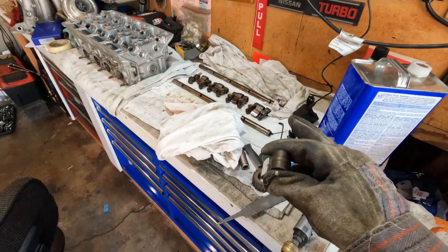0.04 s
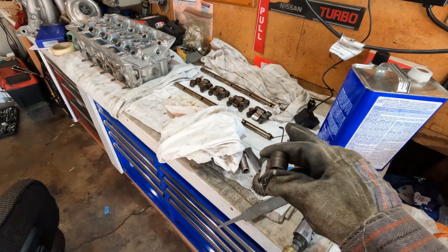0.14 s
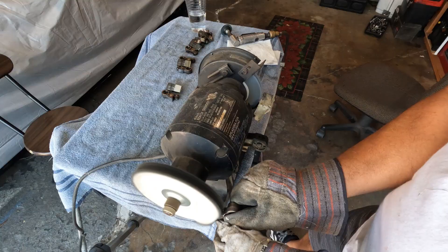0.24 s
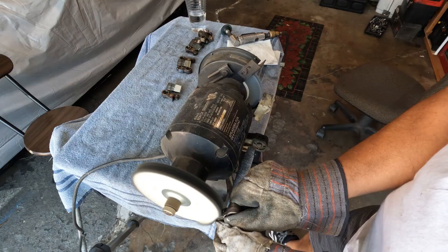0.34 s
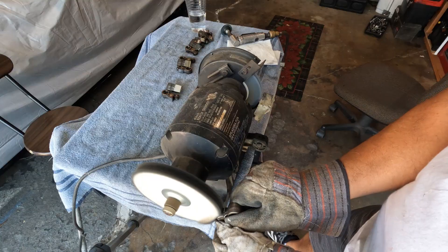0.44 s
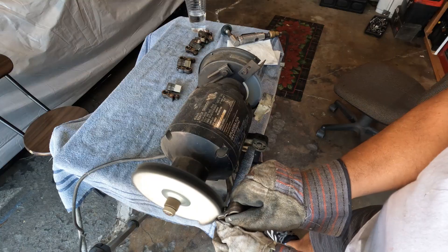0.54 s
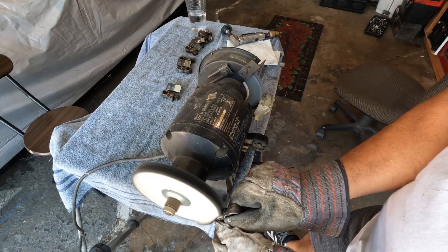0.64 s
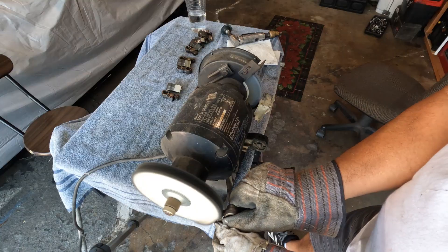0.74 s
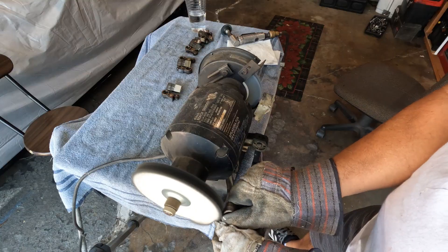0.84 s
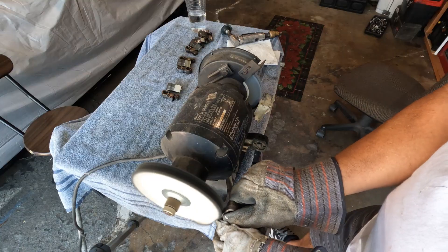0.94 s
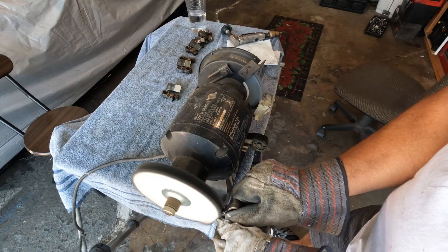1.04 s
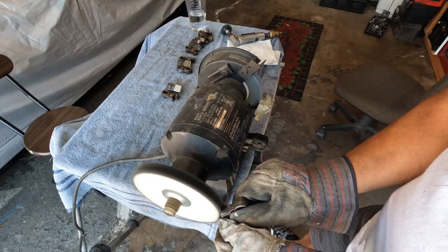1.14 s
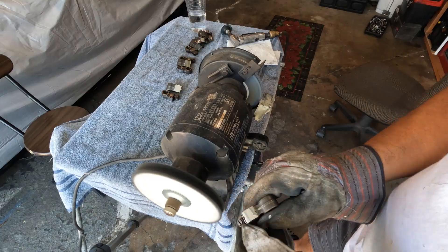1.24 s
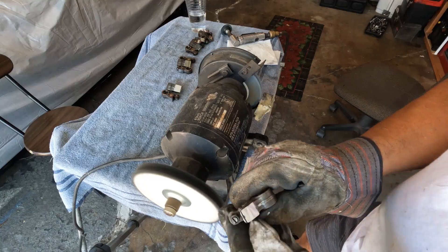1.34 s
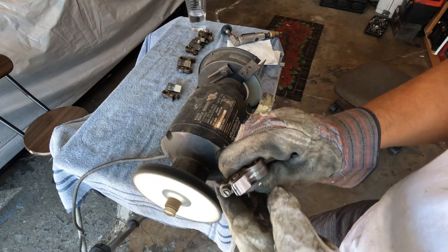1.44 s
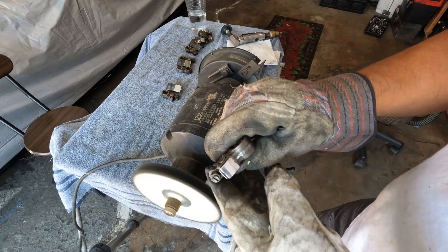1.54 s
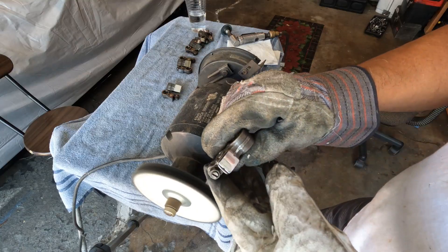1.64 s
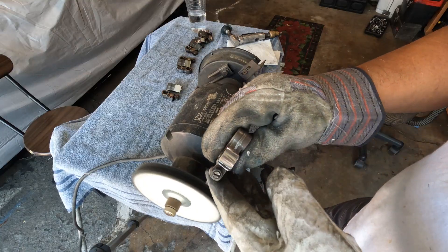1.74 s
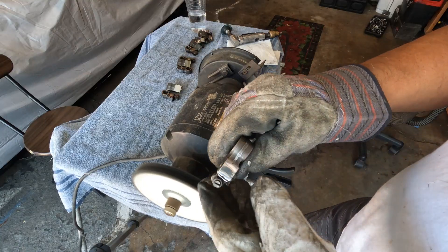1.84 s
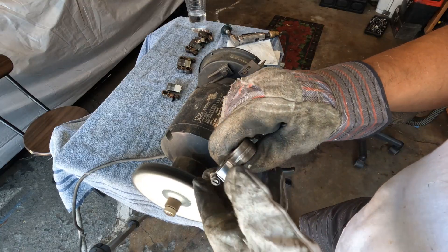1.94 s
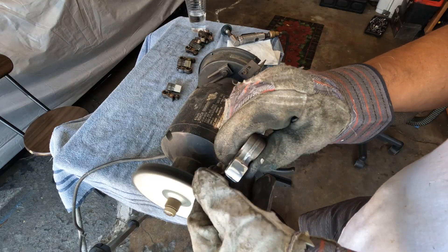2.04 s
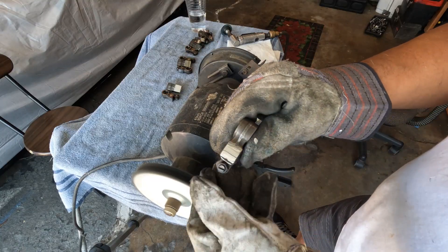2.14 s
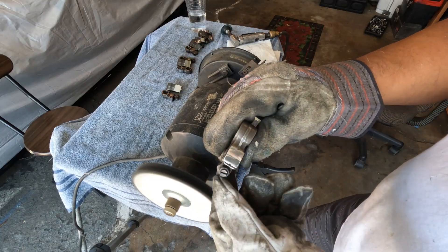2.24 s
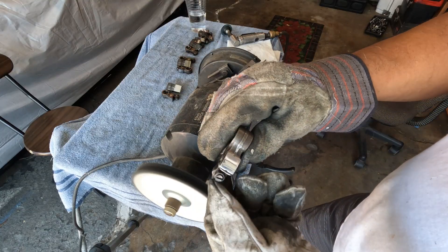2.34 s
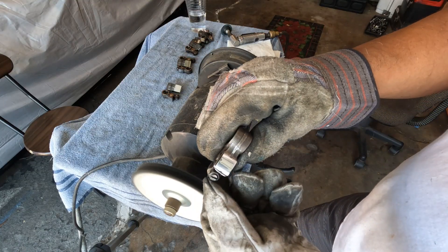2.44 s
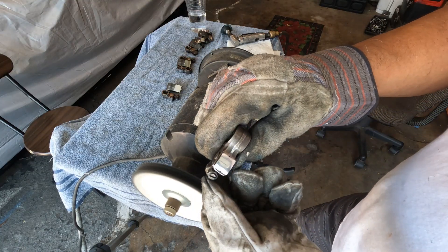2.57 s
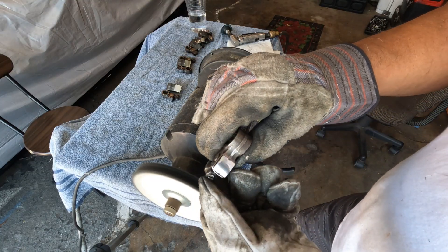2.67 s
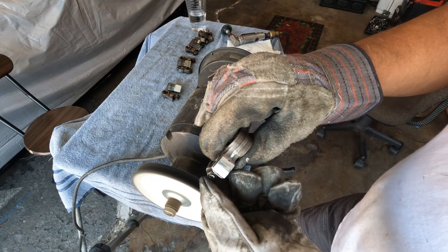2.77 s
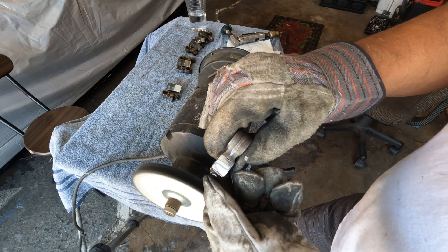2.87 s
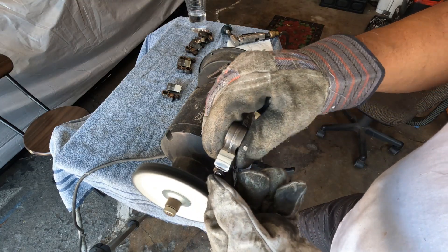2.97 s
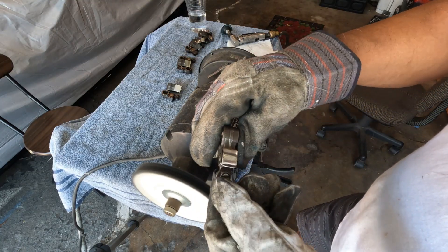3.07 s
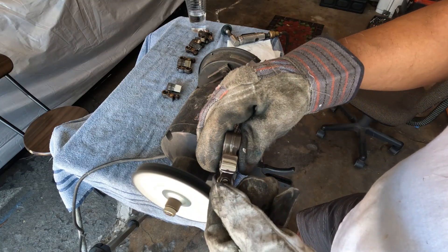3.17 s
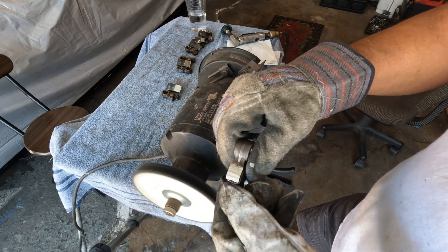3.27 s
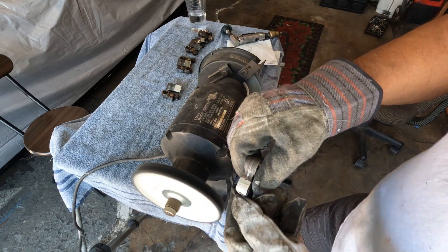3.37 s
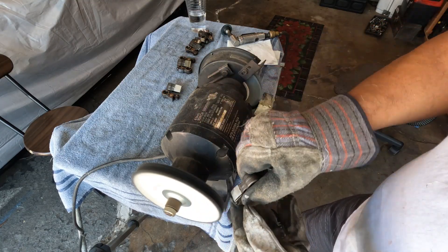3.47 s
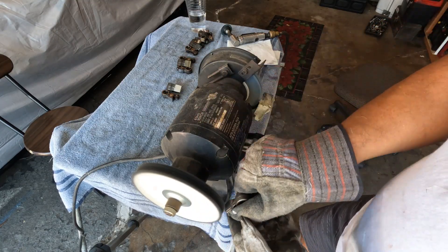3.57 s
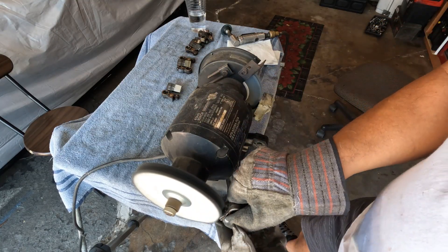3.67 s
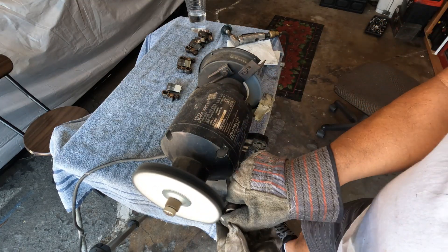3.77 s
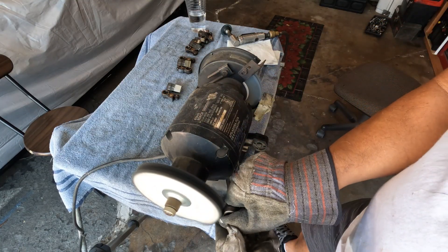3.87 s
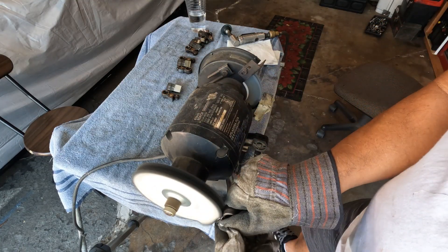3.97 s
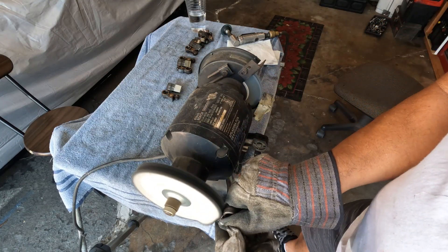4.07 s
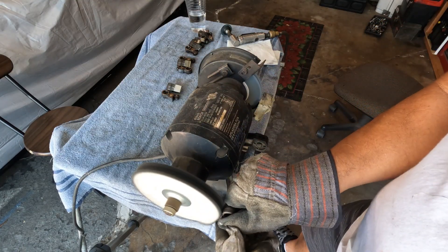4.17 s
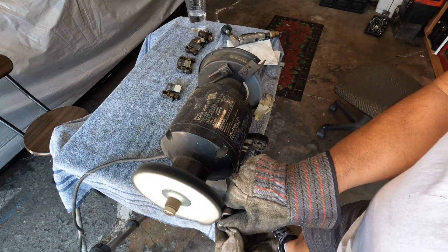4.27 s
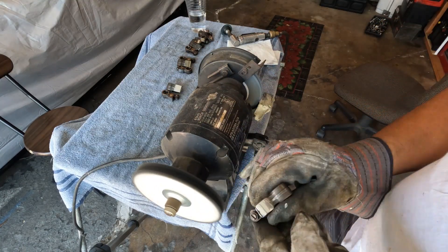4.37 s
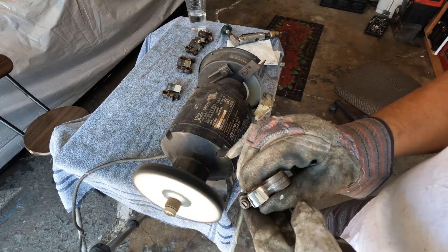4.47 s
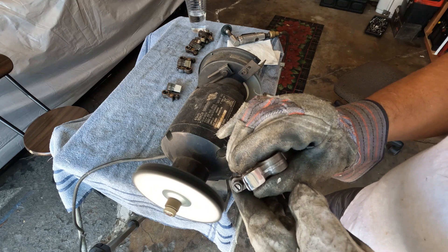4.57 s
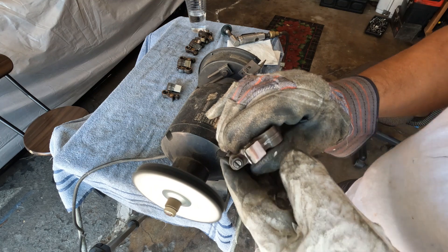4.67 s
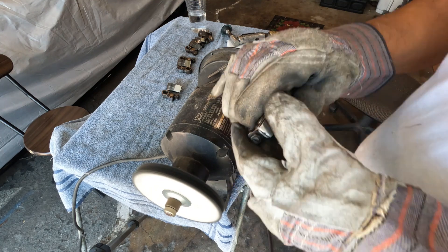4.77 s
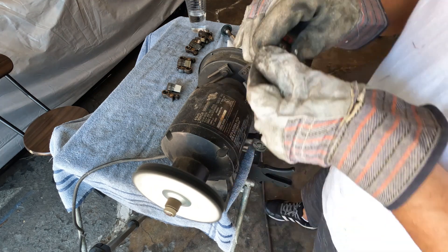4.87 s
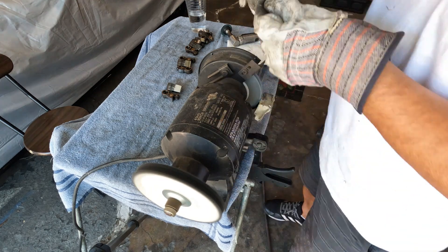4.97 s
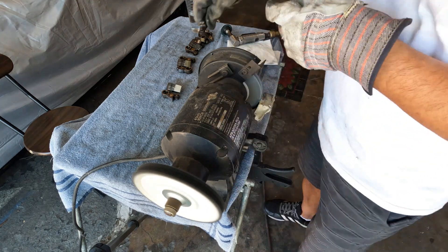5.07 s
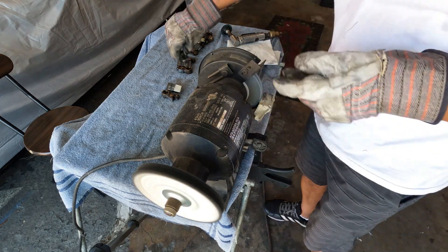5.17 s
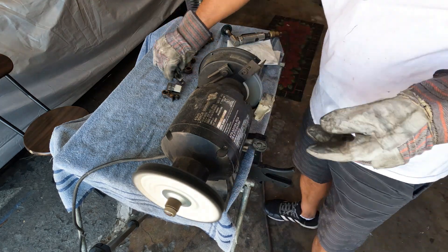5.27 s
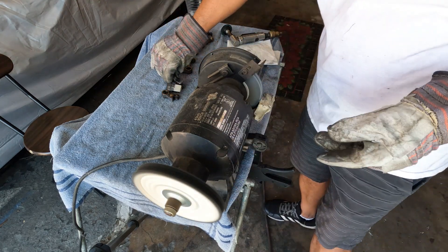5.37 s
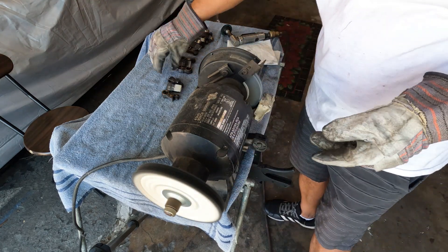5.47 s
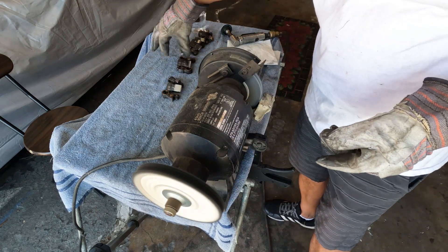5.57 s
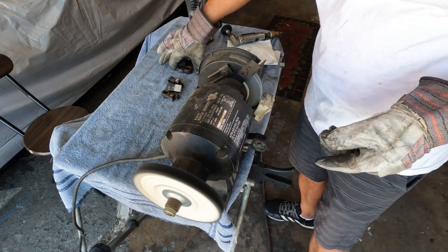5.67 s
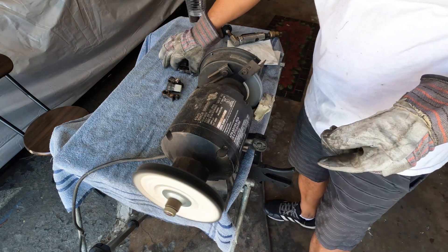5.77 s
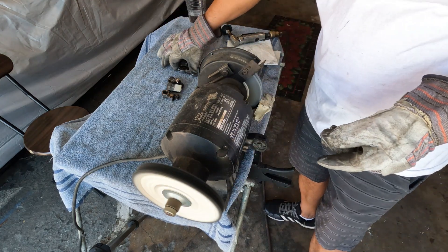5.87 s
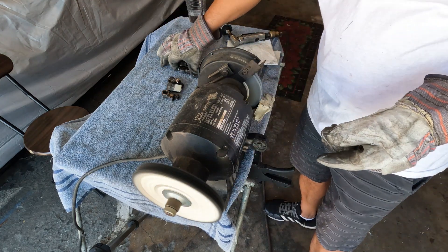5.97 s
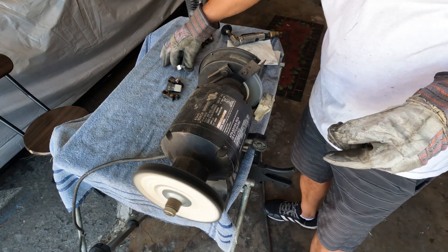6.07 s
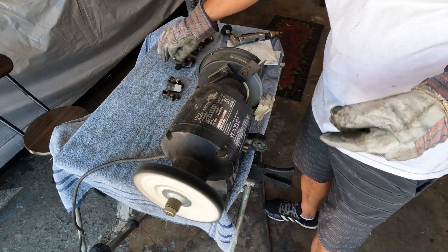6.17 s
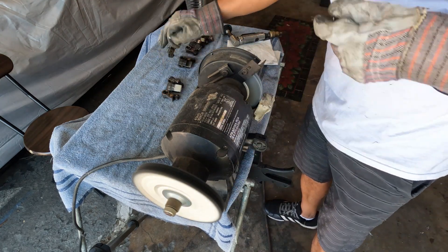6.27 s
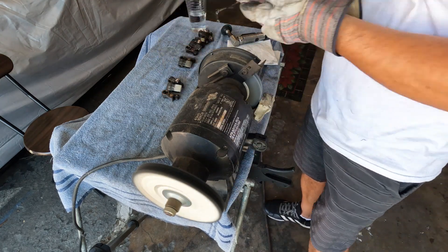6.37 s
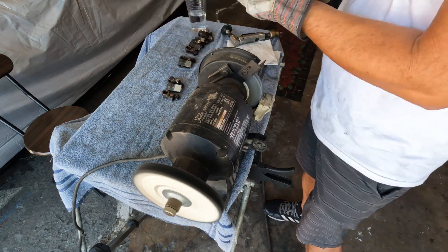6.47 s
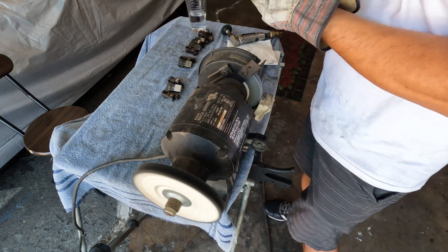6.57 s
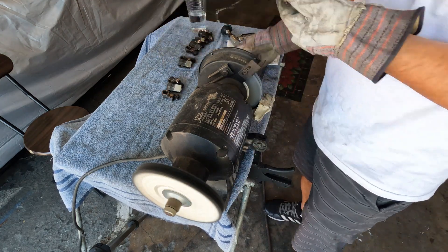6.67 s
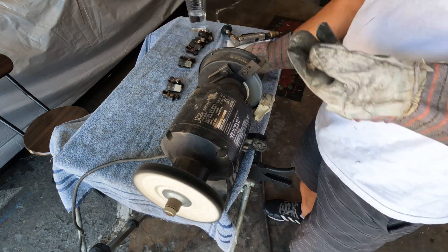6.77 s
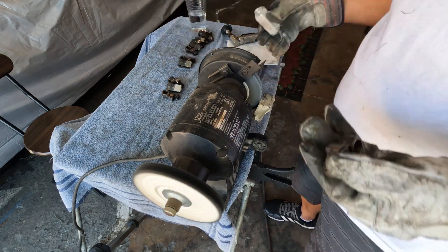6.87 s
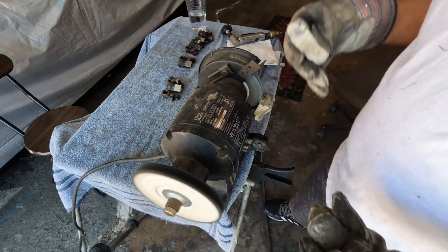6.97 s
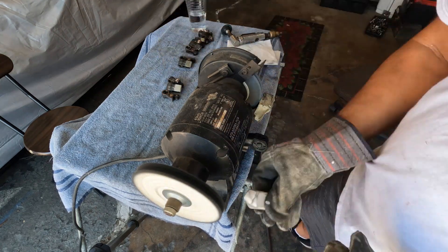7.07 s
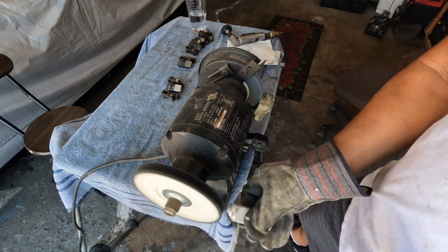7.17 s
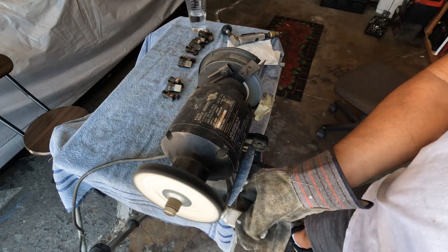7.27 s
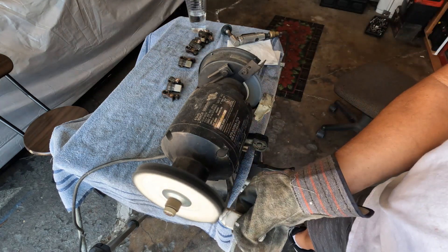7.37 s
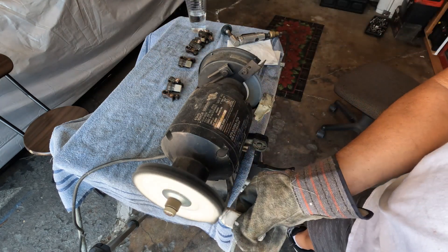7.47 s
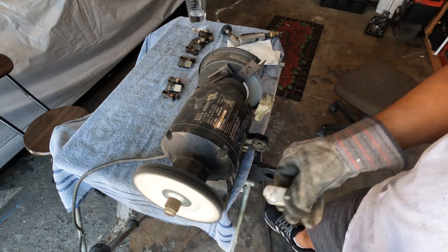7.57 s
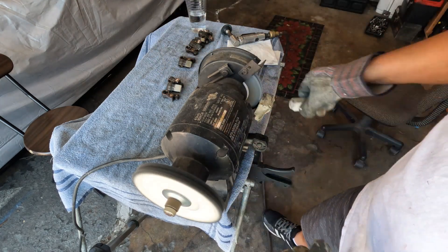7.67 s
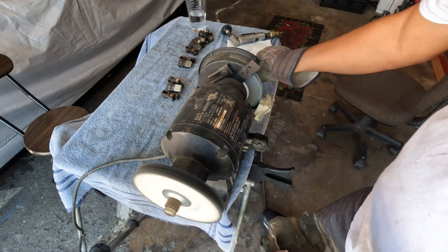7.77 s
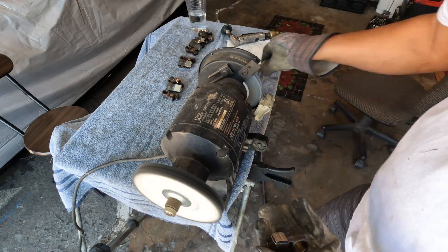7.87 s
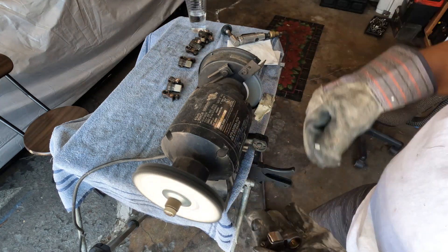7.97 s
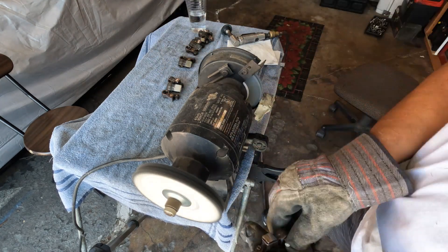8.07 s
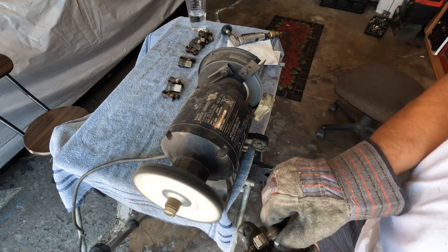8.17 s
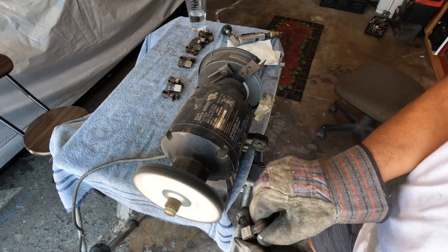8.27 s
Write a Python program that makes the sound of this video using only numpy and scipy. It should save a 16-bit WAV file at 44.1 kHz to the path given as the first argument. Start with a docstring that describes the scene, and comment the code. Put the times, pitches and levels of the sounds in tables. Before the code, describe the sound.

From 0 to 0.28 s, coarse hand rasping sounds over a hollow boom, then the level dips abruptly. A small bench grinder takes over, close and fairly dry, with steel already biting its wheel: a loud, bright, gritty buzz-hiss with fast judder until 1.2 s, the motor pitch slightly sagging. It recovers to a steady idle of thin whine, dry bearing hiss, low-mid air rush and a drone swelling near 2.1 and 3.6 s. A second pass eases in at 3.6 s and scrapes until 4.4 s, where another quick dip nearly silences everything. Idling returns, with bearing hiss stronger and metallic chatter surging around 5.4 and 6.8 s. Soft cloth brushes come near 6.0 and 7.0-7.2 s. A short, lighter, bumpier scrape runs 7.27-7.58 s. At 7.87 s a dull double knock hits the bench; chattering whir continues to 8.3 s.

```python
"""Bench grinder, three passes

A small bench grinder runs in a garage; a steel part is pressed on its wheel three times.
Each pass is a buzzing hiss of repeating grit, with judder; its pitch sags as the motor takes the load.
Tones and drone follow the shaft; shaped noise gives bearing hiss, chatter, air rush and cloth scuffs.
A short rasp of hand work opens; a double bench knock rings near the end; the sound dips quickly twice."""
import sys
import numpy as np
from scipy import signal
from scipy.fft import rfft, irfft, next_fast_len
from scipy.io import wavfile
from scipy.ndimage import uniform_filter1d, map_coordinates

SR = 44100
rng = np.random.default_rng(int(sys.argv[2]) if len(sys.argv) > 2 else 0)


def dump_mix(stems):
    """Bounce the given channels to the path in sys.argv[1] as a 16-bit WAV at rate SR."""
    frames = np.atleast_2d(stems).T  # one column per channel
    limited = np.clip(frames, -1, 1)  # hard clip at full scale
    pcm = np.round(limited * 32767).astype(np.int16)
    wavfile.write(sys.argv[1], SR, pcm)


N = 366471
TIME = np.arange(N) / SR
IDLE_HZ = 119.6  # shaft rate without load; one turn is one beat


# passes of the part on the wheel [start_s, end_s, attack_s, release_s, scrape_db, judder_db,
# chips_db (against the grit, at a firm touch), high_spot_share, run_up_s (from last loaded row)]
PASSES = [(0.279, 1.215, 0.018, 0.041, -32, -40, -14, .14, 0.19),
          (3.619, 4.397, 0.14, 0.016, -33, -40, -15, 0.12, 0.092),
          (7.267, 7.577, 0.033, 0.026, -37.5, -44.5, -14.5, 0.73, .3)]
# tone colour of each pass: peaks and notches added to the scrape [centre_hz, width_hz, lift_db]
PASS_COLOURS = [
    [(2340, 78, 9), (2830, 270, -1.5), (3680, 1500, 1.5), (4450, 200, 4), (8900, 9900, 6.5)],
    [(2270, 32, 2.5), (2450, 91, 4), (3066, 78, 10.5), (3160, 86, -14), (4400, 87, 4), (4500, 150, -6),
     (5870, 1500, 3.5), (13600, 4200, -2.5)],
    [(960, 63, 13), (1270, 850, -7), (2370, 200, 4), (2750, 76, 3), (3240, 150, 4), (4100, 700, 1),
     (4640, 200, 2), (5400, 200, 0), (6500, 250, 4), (7400, 220, 9), (9700, 503, -2), (11100, 930, 8),
     (11900, 450, -12), (14100, 200, 12)],
]
# judder's main ring as the part is rolled, one table a pass [time_s, pitch_hz]
ROLL_PITCH = [
    [(0.31, 5200), (0.798, 5260), (1.13, 5100)],
    [(3.72, 5440), (3.924, 5120), (4.05, 5520), (4.178, 5100), (4.35, 5190)],
    [(7.29, 4830), (7.56, 4610)],
]


def grinding(turns):
    """Steel meets the turning wheel in two firm passes and a short one that bumps on the high spot."""
    return sum(grind(turns, row, peaks, roll) for row, peaks, roll in zip(PASSES, PASS_COLOURS, ROLL_PITCH))


# hand leans on or eases the part [centre_s, half_length_s, scrape_change_db, judder_change_db]
LEANS = [(.36, 0.036, -0.2, 0), (.93, 0.12, -2, 4.5), (3.9, .06, -1, 4.5), (7.389, 0.015, 4, -4),
         (7.486, .055, 4, 2.5)]
# broad colour of scraped steel [freq_hz, relative_level_db]
SCRAPE_COLOUR = [(40, -75), (200, -45), (350, -20.5), (480, -12.5), (750, -9), (1000, -8.5), (1300, -7.5),
                 (1600, -13.5), (2000, -20), (2900, -9), (3500, -1.5), (5000, -1.5), (8500, -6),
                 (12000, -11), (15500, -20)]
# resonances of the steel part [centre_hz, width_hz, lift_db]
STEEL_RINGS = [(815, 53, 7), (1863, 240, 9.5), (2235, 140, 13), (2740, 190, 3), (3033, 57, -1),
               (5500, 720, 3.5), (7000, 180, 2.5), (8640, 350, 4.5), (9850, 430, 7.5), (10700, 500, -0.5),
               (11870, 780, 6.5)]
JUDDER_LAG = 1.7  # judder's attack and release times over the scrape's


def grind(turns, row, pass_peaks, roll):
    """Grit scrapes hardest at the high spot; chips add plain hiss, and judder builds after the bite."""
    start, end, attack, release, scrape_db, judder_db, chips_db, high_spot, _ = row
    touching = (TIME > start) & (TIME < end)
    angle = turns[touching]
    for centre_s, half_length_s, scrape_change_db, judder_change_db in LEANS:
        lean = swell(centre_s, half_length_s)[touching]
        scrape_db = scrape_db + scrape_change_db * lean
        judder_db = judder_db + judder_change_db * lean
    touch = contact(start, end, attack, release)[touching]
    level_db = scrape_db + 20 * np.log10(touch + 1e-6)

    # a light touch skips over the grit: more chip hiss below -27 dB
    chips = gain_of(chips_db - 0.93 * np.minimum(level_db + 27, 0))
    force = grit(angle) + chips * rng.standard_normal(len(angle))
    force /= np.sqrt(1 + chips ** 2)
    force *= 1 + high_spot * bump(angle - .08, sharpness=13.0)
    scrape = colour(force, SCRAPE_COLOUR, STEEL_RINGS + pass_peaks) * gain_of(level_db)

    bitten = contact(start, end, JUDDER_LAG * attack, JUDDER_LAG * release)[touching] ** 2
    bouncing = judder(angle, curve(roll)[touching]) * bitten * gain_of(judder_db)
    out = np.zeros(N)
    out[touching] = scrape + bouncing
    return out


def grit(turns, wear=0.17, patchy_db=3.0, lasting_db=0.5, bands_db=1.5, size=384):
    """A rough turning surface passes a contact: ripples of every length slowly shift as it wears."""
    beats = turns - turns[0]
    shape = (int(beats[-1]) + 3, size // 2 + 1)  # beats, ripples
    wander = wear * np.cumsum(rng.standard_normal(shape), axis=0)
    place_rad = 2 * np.pi * rng.random(shape[1]) + wander
    changing = patchy_db * evened(uniform_filter1d(rng.standard_normal(shape), size=24, axis=0))
    # as the contact moves, neighbouring ripples swell and wane together
    groups = uniform_filter1d(rng.standard_normal(shape), size=20, axis=0)
    groups = bands_db * evened(uniform_filter1d(groups, size=4, axis=1))
    # the finest ripples differ most from one another
    lasting = lasting_db * np.linspace(0, 2, shape[1]) * rng.standard_normal(shape[1])
    height = gain_of(changing + groups + lasting)
    surface = irfft(height * np.exp(1j * place_rad), axis=1)
    return evened(map_coordinates(surface.ravel(), [beats * size], order=3, mode="nearest"))


# strokes within one beat [pitch_factor, width_hz, relative_level_db, delay_beats]
JUDDER_STROKES = [(1, 1020, 1, 0.0035), (0.716, 350, -5, 0.86), (1, 520, -1, 0.18)]


def judder(turns, ring_hz, uneven_db=1.5):
    """The wheel's high spot throws the part off once a beat; it rings briefly and bounces."""
    out = 0
    for factor, width_hz, db, delay_beats in JUDDER_STROKES:
        beat, share = np.divmod(turns - delay_beats, 1)
        beat_db = db + uneven_db * rng.standard_normal(int(beat[-1]) + 1)
        strength = gain_of(beat_db)[beat.astype(int)]
        age_s = share / IDLE_HZ
        decay = np.pi * width_hz * age_s
        ringing = np.sin(2 * np.pi * ring_hz * factor * age_s)
        out = out + strength * decay * np.exp(-decay) * ringing
    return evened(out)


# shaft rate under load, one table a pass [time_s, rate_hz]
LOADED_SPEED = [
    [(0.29, 117.0), (0.618, 117.0), (0.644, 116.6), (1.14, 117.0)],
    [(3.72, 118.8), (4.33, 116.7)],
    [(7.33, 119.5), (7.51, 118.2)],
]
SAG_S = 0.0797  # fall from idle to the first loaded rate


def speed():
    """The motor idles, sags under each pass and runs up again (Hz)."""
    rows = []
    for (*_, run_up_s), loaded in zip(PASSES, LOADED_SPEED):
        rows.append((loaded[0][0] - SAG_S, IDLE_HZ))
        rows += loaded
        rows.append((loaded[-1][0] + run_up_s, IDLE_HZ))
    return curve(rows)


# motor and bearing tones at idle [pitch_hz, level_db (rms, before trim and waver)]
STEADY_TONES = [(119.6, -88), (239.2, -81), (320, -76), (479.1, -63.5), (597.5, -61), (718, -68.5),
                (866.7, -65), (958.2, -62), (1007, -68), (1098, -79), (1206, -65.5), (1373, -72.5),
                (1464, -72.5), (1830, -72), (2751, -74), (2869, -68.5), (3112, -63), (4016, -67.5),
                (5313, -77), (5362, -67), (5857, -61), (5949, -81), (6449, -69), (7041, -71), (7133, -61),
                (7628, -85), (8904, -68), (9399, -88), (9491, -79), (10584, -74)]
# swells added to the drone [crest_s, level_db (rms, before waver)]
DRONE_SWELLS = [(.9, -67), (2.08, -61), (3.58, -61.5), (5.35, -61), (6.65, -60), (7.97, -60)]
# bearing level behind whine and hiss, before their offsets [time_s, level_db]
BEARING_LEVEL = [(1.3, -50), (3.2, -50), (3.55, -48.5), (4.45, -49), (4.75, -51), (5.25, -46), (6.2, -47.6),
                 (7.1, -47), (7.8, -48.5), (8.3, -46.5)]
DRONE_HZ, WHINE_HZ = 366.1, 3349  # at idle
DRONE_HALF_S, DRONE_REST_DB = 0.31, -71.5  # swell half length; level between swells
WHINE_DB = -8.5  # against BEARING_LEVEL


def motor(turns, trim_db=-1, third_db=-71):
    """Shaft-locked hum, a swelling drone that throbs against the third harmonic, and bearing whine."""
    steady = sum(tone(turns, hz, db + trim_db) for hz, db in STEADY_TONES)
    third = tone(turns, 3 * IDLE_HZ, third_db)
    swells = sum(gain_of(db) * swell(s, DRONE_HALF_S) for s, db in DRONE_SWELLS)
    drone = tone(turns, DRONE_HZ, 20 * np.log10(gain_of(DRONE_REST_DB) + swells))
    whine = tone(turns, WHINE_HZ, curve(BEARING_LEVEL) + WHINE_DB)
    return steady + third + drone + whine


def tone(turns, hz, db, waver_db=1., flutter_db=2.27, slip=0.47):
    """A line that follows the shaft; the bearing balls slip, so it wavers and flutters."""
    slip_rad = slip * (1 + np.sqrt(hz / 1000)) * drift(rate=7.)
    phase_rad = 2 * np.pi * (hz * turns / IDLE_HZ + rng.random()) + slip_rad
    level_db = db + waver_db * drift(rate=9.) + flutter_db * drift(rate=60.)
    return np.sqrt(2) * gain_of(level_db) * np.sin(phase_rad)


# dry bearing hiss [freq_hz, relative_level_db]
HISS_COLOUR = [(40, -70), (400, -40), (1000, -17), (2000, -11.5), (2700, -11), (3100, -3), (4500, -3.5),
               (5500, -1), (6500, -1), (7600, -5.5), (8600, -2), (10000, -9.5), (12000, -13),
               (14000, -16.5), (15700, -16.5)]
# housing resonances [centre_hz, width_hz, lift_db]
HOUSING_RINGS = [(3383, 92, 7.8), (4020, 170, 6.2), (7130, 300, 9), (11100, 400, 2), (12560, 220, 8.5),
                 (13500, 300, 4.4), (15000, 350, 7)]


def bearings(turns, throb=0.25, races_db=-8, trim_db=2.0):
    """Rolling balls hiss through the housing, throbbing with the shaft; race marks recur each beat."""
    marks = grit(turns, wear=0.336, patchy_db=6.0, lasting_db=3.5, bands_db=2.5)
    rolling = rng.standard_normal(N) + gain_of(races_db) * marks
    rolling *= 1 + throb * bump(turns, sharpness=4.5)
    level_db = curve(BEARING_LEVEL) + trim_db + 0.63 * drift(rate=25.)
    return gain_of(level_db) * colour(rolling, HISS_COLOUR, HOUSING_RINGS)


# rings excited by the strikes [pitch_hz, width_hz, relative_level_db]
CHATTER_RINGS = [(5730, 110, 1.5), (5550, 300, -1), (4900, 260, -9), (7100, 250, -24)]
# bouts in a loose bearing, added to the rest level [centre_s, half_length_s, level_db (before trim)]
CHATTER_BOUTS = [(1.35, 0.086, -56), (2.25, 0.35, -50.5), (3.58, 0.12, -49), (5.356, 0.41, -49.5),
                 (5.75, 0.25, -56), (6.772, 0.14, -45.5), (7.008, 0.055, -49), (7.703, 0.48, -50),
                 (8.02, 0.084, -47), (8.216, 0.18, -44.5)]
CHATTER_REST_DB = -55.5  # between bouts, before trim


def chatter(turns, uneven_db=2.0, rub=0.25, trim_db=-3.0, surge_db=1.1):
    """Play in a bearing lets it rub all the time and strike once a beat, in surging bouts."""
    touch = rub + bump(turns, sharpness=31.0) * gain_of(uneven_db * drift(rate=84.0))
    strikes = rng.standard_normal(N) * touch
    rung = sum(gain_of(db) * ring(strikes, hz, width_hz) for hz, width_hz, db in CHATTER_RINGS)
    rung = signal.sosfilt(signal.butter(2, 3500, "high", fs=SR, output="sos"), rung)
    bouts = sum(gain_of(db) * swell(s, half_s) for s, half_s, db in CHATTER_BOUTS)
    level = gain_of(CHATTER_REST_DB) + bouts
    return level * gain_of(trim_db + surge_db * drift(rate=14.)) * evened(rung)


# air dragged round by the wheel [freq_hz, relative_level_db]
AIR_COLOUR = [(20, -70), (40, -52), (65, -34), (110, -25), (200, -23.5), (300, -14), (400, -8.5),
              (480, 2.5), (580, 3.5), (680, 1.5), (830, 0), (1100, -6), (1350, -4), (2000, -17.5),
              (4000, -19)]
# air rush [time_s, level_db (before trim)]
RUSH_LEVEL = [(.3, -51.5), (3.0, -48.5), (4.1, -50), (5.1, -50), (5.8, -52.5), (6.7, -52), (7.6, -50),
              (8.3, -48.5)]


def air(trim_db=-1.12):
    """The rush of air round the wheel: slightly gusty shaped noise."""
    level_db = curve(RUSH_LEVEL) + trim_db + 0.7 * drift(rate=14.)
    return gain_of(level_db) * colour(rng.standard_normal(N), AIR_COLOUR)


# blows [time_s, ring_peak_db (before thud, clack and band filter)]
KNOCKS = [(7.8729, -29), (7.8791, -26)]
# bench modes [pitch_hz, relative_level_db, t60_s]
BENCH_MODES = [(333, -2, 0.076), (377, -2, 0.069), (513, 5, 0.048), (647, 5, 0.043), (796, 3.5, 0.061),
               (1170, 1, 0.056), (1270, 1, 0.049), (1480, -6, 0.05), (2150, -12, 0.025)]


def knocks(thud_db=-13, thud_t60_s=0.026, clack_db=-10, clack_t60_s=0.011, low_hz=120):
    """A dull double knock: short thud and clack noise over the ring of the cloth-covered bench."""
    t = TIME[:SR // 4]
    out = np.zeros(N)
    modes = 0
    for k, (hz, db, t60_s) in enumerate(BENCH_MODES):
        modes = modes + (-1) ** k * gain_of(db - 60 * t / t60_s) * np.cos(2 * np.pi * hz * t)
    for s, db in KNOCKS:
        thud = colour(rng.standard_normal(len(t)), [(30, -25), (250, -8), (600, 2), (2200, -6), (3300, -35)])
        clack = colour(rng.standard_normal(len(t)), [(300, -20), (1200, 0), (2300, -2), (3000, -30)])
        blow = modes / abs(modes).max()
        blow = blow + thud * gain_of(thud_db - 60 * t / thud_t60_s)
        blow += clack * gain_of(clack_db - 60 * t / clack_t60_s)
        out[round(s * SR):][:len(t)] += gain_of(db) * blow
    return signal.sosfilt(signal.butter(2, [low_hz, 3000], "band", fs=SR, output="sos"), out)


# hollow boom [freq_hz, relative_level_db]
BOOM_COLOUR = [(18, -62), (30, -26), (86, -23), (210, -12.5), (286, 1), (383, -10.5), (420, -3.5),
               (521, -11), (599, -2), (668, -21), (721, -9.5), (937, -18.5), (1200, -21), (1560, -51),
               (2640, -120)]
# coarse rasp [freq_hz, relative_level_db]
RASP_COLOUR = [(590, -37), (1000, -17), (1230, -13), (1570, -4.5), (2730, -6), (3220, -6.5), (3480, -4.5),
               (5850, -15.5), (6180, -13), (7970, -19.5), (9000, -29), (10400, -23.5), (14000, -48)]
BOOM_DB, RASP_DB = -42, -42  # rms


def handwork():
    """Unevenly flickering noise makes a coarse rasp, over a steady hollow boom."""
    boom = colour(rng.standard_normal(N), BOOM_COLOUR, [(290, 65, 3.2)])
    flicker_db = 0.66 * drift(rate=300.) + 1.7 * drift(rate=44.4)
    teeth = rng.standard_normal(N) * gain_of(flicker_db)
    rasp = colour(teeth, RASP_COLOUR, [(2010, 33, 10.0), (3433, 29, 12)])
    return gain_of(BOOM_DB) * boom + gain_of(RASP_DB) * rasp


# brushes of gloves and clothes [centre_s, half_length_s, level_db]
SCUFFS = [(5.98, 0.054, -50.5), (7.008, 0.024, -52), (7.104, .06, -53), (7.24, 0.059, -52.5)]
# colour of a scuff [freq_hz, relative_level_db]
CLOTH_COLOUR = [(60, -40), (250, -18), (550, 9), (900, -1), (1400, -8), (2500, -21), (6000, -28)]


def scuffs():
    """Gloves and clothes brush softly as the hands move: short swells of dull noise."""
    level = sum(gain_of(db) * swell(s, half_s) for s, half_s, db in SCUFFS)
    return level * colour(rng.standard_normal(N), CLOTH_COLOUR)


def gain_of(db):
    """Decibels to amplitude."""
    return 10 ** (np.asarray(db) / 20)


def evened(x):
    """Scales to rms 1."""
    return x / np.sqrt(np.mean(x ** 2) + 1e-20)


def curve(rows, column=1):
    """A control table joined by straight lines in time."""
    rows = np.asarray(rows)
    return np.interp(TIME, rows[:, 0], rows[:, column])


def colour(x, points, peaks=()):
    """Filters x by a broad spectrum plus peaks or notches, then scales to rms 1."""
    size = next_fast_len(len(x) + 4096)
    hz = np.fft.rfftfreq(size, 1 / SR)
    point_hz, point_db = np.transpose(points)
    db = np.interp(np.log(hz + 1), np.log(point_hz + 1), point_db)
    for centre_hz, width_hz, lift_db in peaks:
        db = db + lift_db / (1 + (2 * (hz - centre_hz) / width_hz) ** 2)
    return evened(irfft(rfft(x, size) * gain_of(db), size)[:len(x)])


def drift(rate):
    """Smooth chance of rms 1 that changes about rate times a second."""
    knots = rng.standard_normal(4096)
    coarse = TIME[::64]
    smooth = map_coordinates(knots, [coarse * rate], order=3, mode="wrap")
    return np.interp(TIME, coarse, evened(smooth))


def ring(x, hz, width_hz):
    """One decaying resonance: a complex one-pole filter."""
    r = np.exp(-np.pi * width_hz / SR)
    return 2 * signal.lfilter([1 - r], [1, -r * np.exp(2j * np.pi * hz / SR)], x).real


def bump(turns, sharpness):
    """A swell of contact once a beat."""
    return np.exp(sharpness * (np.cos(2 * np.pi * turns) - 1))


def swell(s, half_length_s):
    """A smooth rise and fall of height 1 round the time s."""
    return np.exp(-((TIME - s) / half_length_s) ** 2)


def contact(start, end, attack, release):
    """Eases in, holds at 1 and eases out."""
    u = np.clip(np.minimum((TIME - start) / attack, (end - TIME) / release), 0, 1)
    return np.sin(np.pi / 2 * u) ** 2


def scene():
    """Hand work up to the first dip, then the grinder with its shaft-driven sounds, scuffs and knocks."""
    turns = np.cumsum(speed() + 0.0413 * drift(rate=12.)) / SR
    grinder = grinding(turns) + motor(turns) + air() + bearings(turns) + chatter(turns)
    return np.where(TIME < DIPS[0][0], handwork(), grinder + scuffs() + knocks())[None]


# fades nearly to silence and back [bottom_s, fall_s, rise_s]
DIPS = [(.283, 0.029, 0.037), (4.387, 0.04, 0.03)]
EDGE_HZ = 15680  # lowpass cutoff


def record(dry):
    """Two quick dips in level, then the band limit."""
    for bottom_s, fall_s, rise_s in DIPS:
        away = np.clip(np.maximum((bottom_s - TIME) / fall_s, (TIME - bottom_s) / rise_s), 0, 1)
        dry = dry * (away ** 2 + 0.019 * (1 - away))  # floor gain 0.019
    lowpass = signal.firwin(1023, EDGE_HZ, window=("kaiser", 9), fs=SR)
    return signal.oaconvolve(dry, lowpass[None], "same")


dry = scene()
out = record(dry)
dump_mix(out)
```